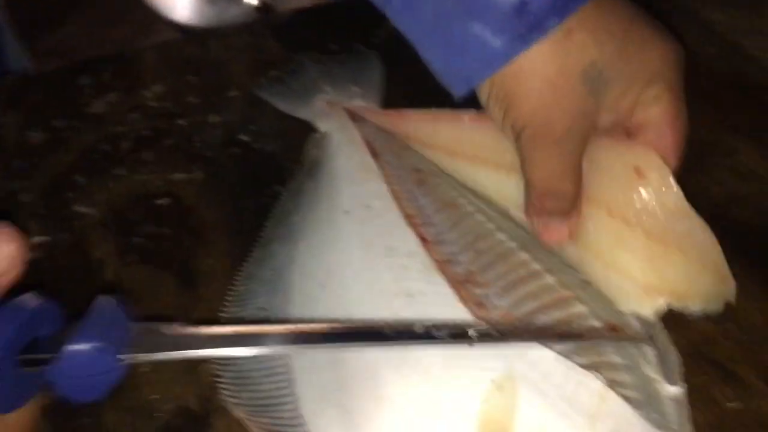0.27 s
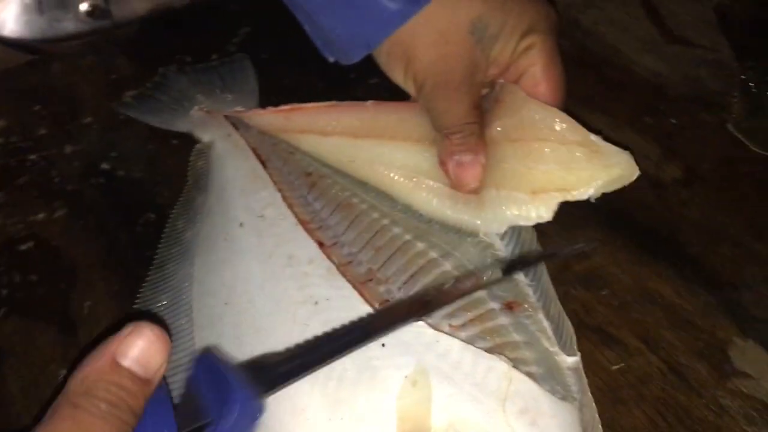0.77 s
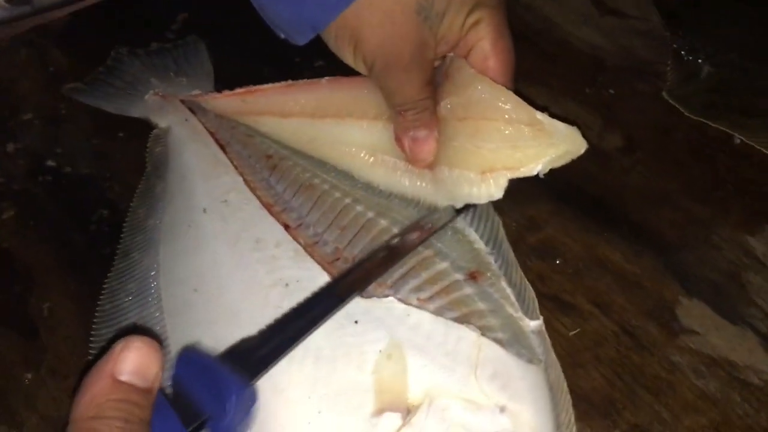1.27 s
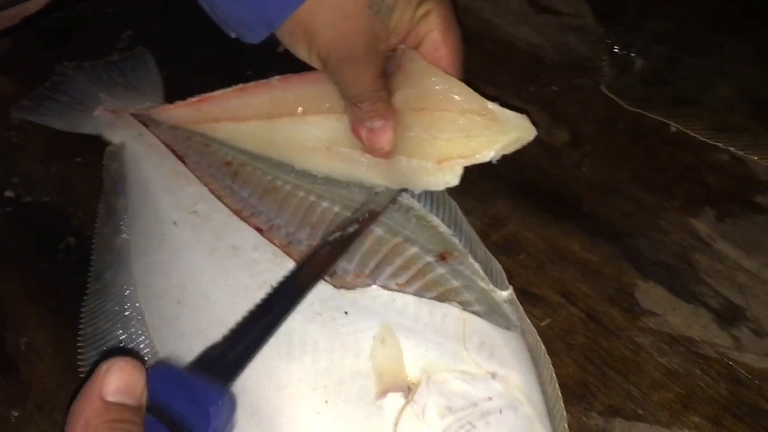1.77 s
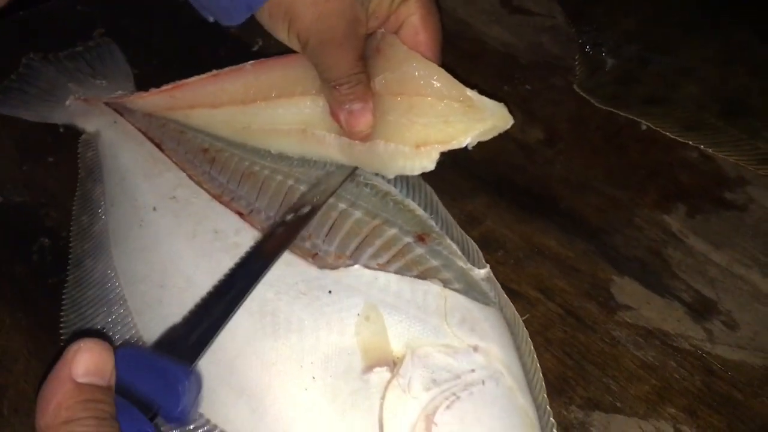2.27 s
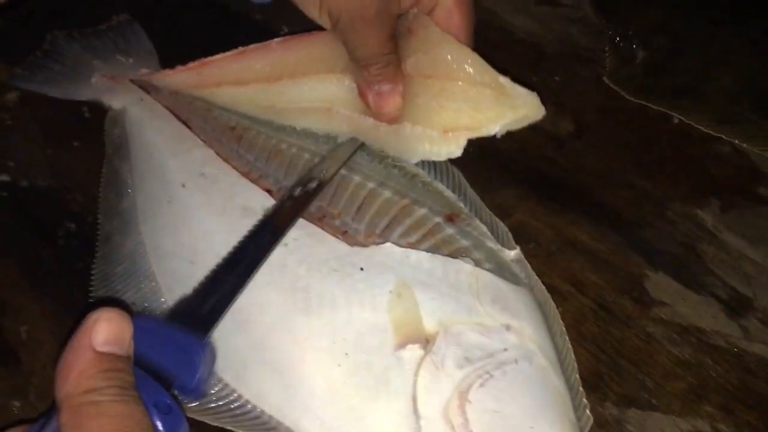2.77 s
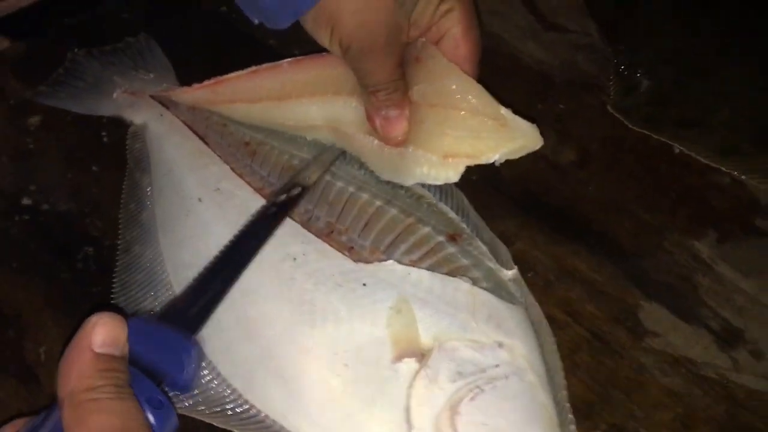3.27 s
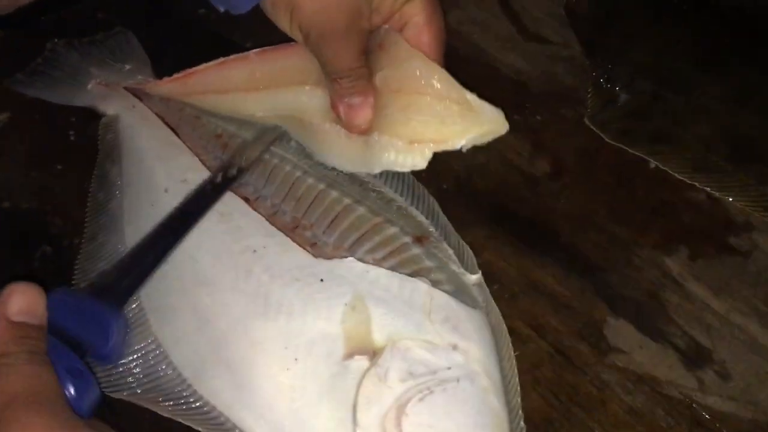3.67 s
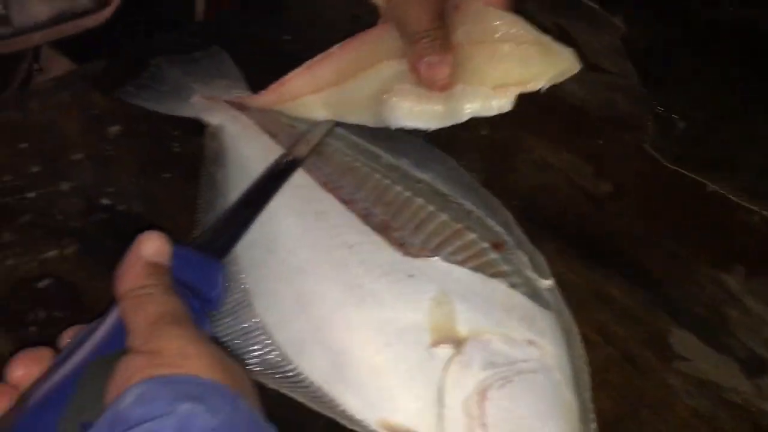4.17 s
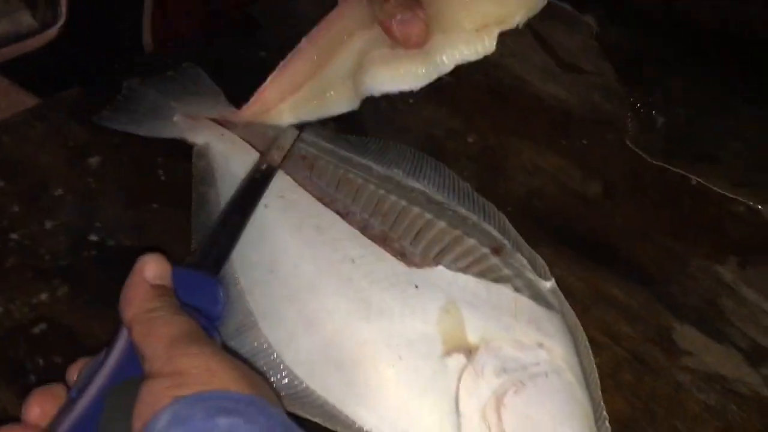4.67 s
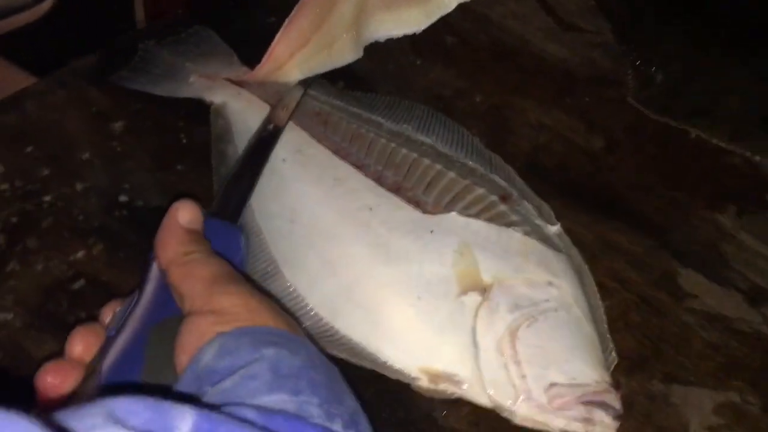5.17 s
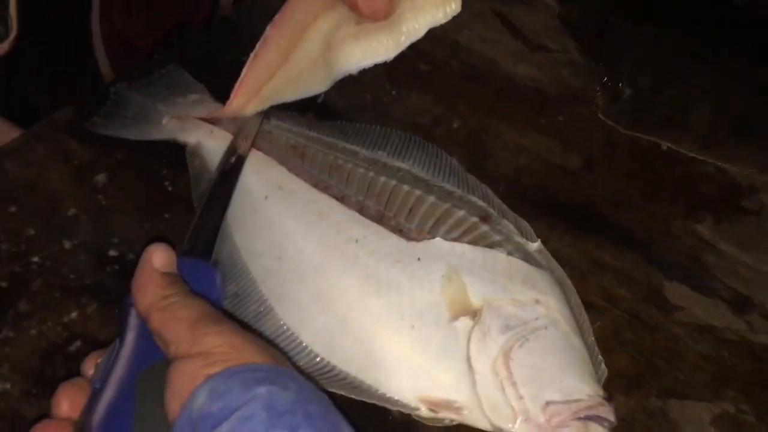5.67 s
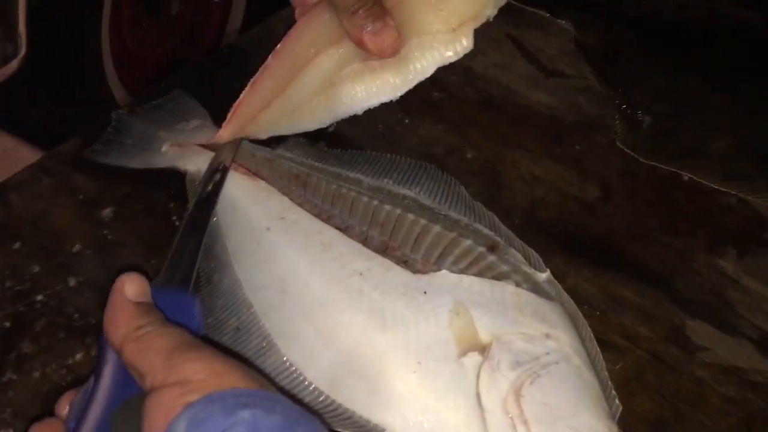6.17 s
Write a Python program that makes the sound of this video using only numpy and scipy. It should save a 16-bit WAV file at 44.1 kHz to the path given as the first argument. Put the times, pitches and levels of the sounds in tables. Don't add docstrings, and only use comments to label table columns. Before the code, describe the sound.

A close, dry electric knife runs without pause, a fast rattling buzz of plastic knocks at each stroke. Twin steel blades scrape and slap, with sharp ticks along fish bones. A thin high whine and gear hiss sit inside it. Soft thuds sound in the first second, over a weak outdoor rumble, caught by a small microphone.

```python
import sys
import numpy as np
from scipy import signal
from scipy.fft import rfft, irfft, next_fast_len
from scipy.io import wavfile
from scipy.ndimage import uniform_filter1d, map_coordinates

SR = 44100
rng = np.random.default_rng(int(sys.argv[2]) if len(sys.argv) > 2 else 0)


def store_wav(level_fs):
    pcm = np.round(np.clip(np.atleast_2d(level_fs), -1, 1) * 32767)
    wavfile.write(sys.argv[1], SR, pcm.T.astype(np.int16))


def gain_from_decibels(decibels):
    exponent = np.asarray(decibels, float) / 20
    return 10 ** exponent


N = 283197


def unit(x):
    return x / np.sqrt(np.mean(x ** 2) + 1e-20)


def curves(rows):
    time_s, *columns = np.transpose(rows)
    return [np.interp(np.arange(N) / SR, time_s, c) for c in columns]


def spells(rows):
    t = np.arange(0, N, 64) / SR
    db = sum(rise_db * np.exp(-((t - s) / max(half_s, .01)) ** 2) for s, half_s, rise_db in rows)
    return np.interp(np.arange(N) / SR, t, db)


def wobble(rate_hz):
    knots = rng.standard_normal(int(N * rate_hz / SR) + 4)
    return map_coordinates(knots, [np.arange(N) * rate_hz / SR])


def filtered(x, response):
    m = next_fast_len(N + 8192)
    return irfft(rfft(x, m) * response(np.fft.rfftfreq(m, 1 / SR)), m)[..., :N]


def coloured(x, spectrum):
    f, db = np.transpose(spectrum)
    return unit(filtered(x, lambda hz: gain_from_decibels(np.interp(np.log(hz + 1), np.log(f), db))))


def bumps(rows):
    return lambda hz: gain_from_decibels(sum(db * np.exp(-((hz - c) / w) ** 2) for c, w, db in rows))


def patchy(patchy_db, bins, frames):
    z = signal.stft(rng.standard_normal(N), nperseg=128)[2]
    field = uniform_filter1d(rng.standard_normal(z.shape), bins, 0)
    field = uniform_filter1d(field, frames, 1)
    return signal.istft(z * gain_from_decibels(patchy_db * unit(field)), nperseg=128)[1][:N]


# time_s, whine_hz (commutator)
SPEED = [(0.0, 13791.2), (0.15, 13780.8), (0.5, 13859.2), (0.65, 13806.9), (1.05, 13816.4), (1.4, 13723.1),
         (2.15, 13622.6), (2.5, 13590.2), (2.7, 13632.6), (3.1, 13507.5), (3.5, 13588.3), (3.9, 13703.7),
         (4.25, 13774.7), (4.87, 13656.5), (5.15, 13868.7), (5.3, 13842.9), (5.7, 13719.9), (6.42, 13658.8)]
WHINE_PER_TURN, START_TURNS = 400.335, 1.021


def crank():
    return START_TURNS + np.cumsum(curves(SPEED)[0]) / SR / WHINE_PER_TURN


def burst(turns, rise_turns, fall_turns, scatter_db, jitter_turns):
    luck = rng.standard_normal((300, 2))[(turns + 1 / 4).astype(int)]
    u = (turns + 1 / 4) % 1 - 1 / 4 - jitter_turns * luck[:, 0]
    shape = np.exp(-np.where(u < 0, (u / rise_turns) ** 2, u / fall_turns))
    return gain_from_decibels(scatter_db * luck[:, 1]) * shape


def ring(blows, modes, scatter_db, soft_hz):
    def mode(f):
        resonance = 1j * f * w / (c * c - f * f + 1j * f * w)
        low_cut = (f * f / (f * f - 560 ** 2 - 700j * f)) ** 2
        return resonance * low_cut / (1 + 1j * f / soft_hz) ** 3

    out = 0
    for c, w, db in modes:
        struck = blows * gain_from_decibels(scatter_db * rng.standard_normal(N))
        out = out - gain_from_decibels(db) * filtered(struck, mode)
    return out


# time_s, knock_delay_turns, slap_angle_turns, buried_in_flesh_0_to_1
CONTACT = [(0, .17, .68, 0), (.6, .13, .65, .2), (1.0, .06, .62, .8), (1.25, .03, .56, .9),
           (1.45, .025, .44, 1), (2.2, .02, .43, 1), (2.4, .0, .7, 1), (4.8, .0, .68, 1),
           (5.05, .0, .47, 1), (5.35, .0, .47, 1), (5.5, .0, .65, 1), (6.42, .0, .66, 1)]
# time_s, push_db (on handle), play_db (between blades), slack_db (at drive pin)
HAND = [(0, -1, 2.5, -0.5), (.25, -1, 2, -3.5), (.6, 1, 2.5, -4.5), (1.0, 0.5, 3, -5.5),
        (1.4, 2.5, -1, -2.5), (2.0, 3, 0, -0.5), (2.2, 2, -4, -2.5), (2.45, 3, 0.5, -2.5), (3.0, 2, 2, 1),
        (3.4, 0, 1, -1.5), (4.0, 1, -2, -2), (4.4, 2, -4.5, -3.5), (4.8, 2.5, -6, -3), (5.2, 2, -4, -4),
        (5.4, 1.5, -3, 0.5), (5.7, 2, -6.5, 0), (6.0, 0, -1.5, 1.5), (6.42, 2.5, -7, -1)]
# time_s, peak_db
HARD_KNOCKS = [(0.456, -8.5), (0.601, -11.5), (0.63, -17), (0.703, -15), (0.717, -12), (0.891, -10),
               (0.932, -18), (0.947, -9), (0.992, -18), (1.005, -8), (1.049, -19), (1.063, -6.5),
               (1.193, -12), (1.21, -11), (1.241, -13), (1.309, -11), (1.341, -13), (1.383, -14),
               (1.429, -7), (1.457, -8), (1.545, -8), (1.573, -17), (1.587, -7.5), (1.633, -9),
               (1.646, -13), (1.721, -13), (1.747, -10), (1.776, -5), (1.835, -10), (1.851, -12),
               (1.924, -10), (1.952, -7), (2.057, -14), (2.07, -8.5), (2.146, -14), (2.187, -15),
               (2.202, -8), (2.247, -14), (2.335, -16), (2.365, -8), (2.423, -14), (2.452, -9), (2.481, -8),
               (2.512, -6.5), (2.658, -12), (2.674, -14), (2.734, -19), (2.748, -7), (2.805, -11),
               (2.834, -10), (2.864, -14), (2.911, -14), (2.939, -11.5), (2.969, -8), (3.041, -17),
               (3.071, -9),
               (3.266, -14), (3.277, -9), (3.308, -9), (3.354, -12), (3.366, -9), (3.384, -13),
                    (3.444, -17), (3.455, -13), (3.483, -13), (3.544, -11), (3.633, -8), (3.705, -7),
                    (3.749, -9), (3.866, -12), (3.925, -12), (4.014, -14), (4.069, -14.5), (4.1, -16),
                    (4.128, -12), (4.188, -9), (4.216, -19), (4.262, -21), (4.274, -6.5), (4.303, -9),
                    (4.332, -8.5), (4.362, -11), (4.39, -9), (4.449, -8), (4.478, -8), (4.506, -11),
                    (4.566, -7), (4.625, -9), (4.669, -13), (4.712, -6), (4.858, -14), (4.902, -9),
                    (5.004, -8), (5.08, -9), (5.323, -7.5), (5.379, -13), (5.452, -11), (5.497, -13),
                    (5.514, -7), (5.6, -6), (5.687, -16.5), (5.759, -9), (5.787, -11), (5.832, -17),
                    (5.876, -13), (5.994, -16), (6.05, -15), (6.125, -8), (6.153, -12), (6.183, -6.5),
                    (6.211, -6), (6.256, -12)]
# time_s, forward_db, late_rebound_db
LEAN = [(0, -0.5, 0), (.9, 7, 7), (1.3, 2, 6), (1.7, 2, -1), (2.2, 2, 1), (2.5, 1.5, -4), (4.2, 3, 2),
        (4.9, 5, 4), (5.2, -1, 12.5), (5.6, 2, -4), (6.42, -4.5, 3.5)]
# centre_hz, width_hz, level_db
FREE_MODES = [(667, 48, 1), (1220, 770, -6), (1720, 180, -6), (3250, 160, -5)]
# centre_hz, width_hz, level_db
BURIED_MODES = [(700, 91, -7.5), (1104, 318, -2), (1780, 130, -7.5), (3040, 410, -17)]
KNOCK_DB, BURIED_KNOCK_DB, KNOCK_PER_PUSH = -33.5 + 18.5, 5, 0.35
HARD_LAG_S, HARD_DB = .0008, 30.5


def knocks():
    delay, _, buried = curves(CONTACT)
    push_db, _, slack_db = curves(HAND)
    stroke = np.floor(2 * (crank() - delay - .225))
    ends = np.flatnonzero(np.diff(stroke) > 0) + 1
    luck = rng.standard_normal((500, 8))[:len(ends)]
    hard_s, hard_db = np.transpose(HARD_KNOCKS)
    hard = np.round((hard_s + HARD_LAG_S) * SR).astype(int)
    spared = np.abs(ends[:, None] - hard).min(1) > .006 * SR
    forward = stroke[ends] % 2 == 0
    lean_db, rebound_db = (c[ends] for c in curves(LEAN))
    # lag_s, spread_s, level_db, forward_db, extra_db, played, sign
    hits = [(0, .0005, 1, 0, lean_db, spared, 1),
            (.002, .001, -13, 1, lean_db, 1, 1),
            (-.002, .0012, -17, 2, lean_db, spared, -1),
            (.0075, .001, -15, 5, rebound_db, 1, 1)]
    blows = np.zeros(N + SR)
    for k, (lag_s, spread_s, db, forward_db, extra_db, played, sign) in enumerate(hits):
        at = np.abs(ends + SR * (lag_s + spread_s * luck[:, 2 * k])).astype(int)
        hit_db = db + (forward_db + extra_db) * forward + (1.1 + .6 * k) * luck[:, 2 * k + 1]
        np.add.at(blows, at, gain_from_decibels(hit_db) * played * sign)
    level_db = KNOCK_DB + BURIED_KNOCK_DB * buried + KNOCK_PER_PUSH * push_db + slack_db
    blows = unit(blows[:N]) * gain_from_decibels(level_db)
    blows[hard] += gain_from_decibels(hard_db + HARD_DB)
    free_ring = ring(blows * (1 - buried), FREE_MODES, scatter_db=3.2, soft_hz=3670)
    return free_ring + ring(blows * buried, BURIED_MODES, scatter_db=2.0, soft_hz=2600)


# time_s, centre_hz, share_of_scrape
TAIL_RING = [(0, 3100, 0.11), (4.7, 3050, 0), (5.0, 3060, 0.55), (5.3, 3215, 0.31), (6.05, 3290, 0.27),
             (6.42, 2640, 0.4)]
TAIL_RING_WIDTH_HZ = 400


def tail_ring(envelope):
    centre_hz, share = curves(TAIL_RING)
    phase = 2 * np.pi * np.cumsum(centre_hz) / SR
    band = wobble(TAIL_RING_WIDTH_HZ) * np.sin(phase) + wobble(TAIL_RING_WIDTH_HZ) * np.cos(phase)
    return np.clip(share, 0, 1) * unit(envelope * band)


# freq_hz, level_db_per_hz
STEEL = [(1200, -11.5), (2200, 4), (3000, 0.5), (4200, 1.5), (6500, 0), (8000, -4.5), (10000, -8),
         (13000, -10.5), (16500, -15.5)]
SCRAPE_DB = -35 + 1.5


def scrape():
    buried, play_db = curves(CONTACT)[2], curves(HAND)[1]
    angle, grit = crank(), gain_from_decibels(1.5 * wobble(1500))
    drag = burst(angle - .14 - 0.024 * (1 - buried), 0.074, 0.15, scatter_db=1.5, jitter_turns=0.014)
    drag += 0.22 * burst(angle - .72, 0.027, .2, scatter_db=1.5, jitter_turns=0.015)
    drag += 0.31 * burst(angle - .44, 0.055, 0.16, scatter_db=1.8, jitter_turns=.015)
    rub = unit(unit(drag * grit) * coloured(patchy(2.6, 8, 3), STEEL))
    return gain_from_decibels(SCRAPE_DB + play_db) * (rub + tail_ring(drag))


# freq_hz, level_db
BRIGHT = [(3000, -5), (6000, 3), (9000, 1.5), (14000, -7.5), (16500, 2)]
# freq_hz, level_db_per_hz
SLAP = [(1500, -4.5), (3000, -0.5), (5000, 2.5), (7000, -5.5), (9500, 0), (11500, -2.5), (14000, -13),
        (16500, -7.5)]
# centre_s, half_s, rise_db
SLAPPING = [(.25, 0.36, 18), (.85, 0.33, 16), (1.5, 0.39, 17.5), (2.5, 0.39, 11), (3.62, .12, 7),
            (4.15, 0.4, 9.5), (4.68, 0.17, 12.5), (5.25, 0.2, 7), (5.6, 0.15, 6), (6.12, 0.29, 13)]
SLAP_DB = -46 - 7.0


def slaps():
    _, slap_angle, buried = curves(CONTACT)
    contact = burst(crank() - slap_angle - .01, 0.014, 0.048, scatter_db=2.7, jitter_turns=0.016)
    slap = coloured(unit(contact * patchy(0.75, 8, 3)), SLAP)
    slap = slap + .5 * (1 - buried) * coloured(slap, BRIGHT)
    return gain_from_decibels(SLAP_DB + spells(SLAPPING)) * slap


# time_s, peak_db
SHARP_TICKS = [(0.0917, -24), (0.1057, -14), (0.136, -12), (0.2063, -16), (0.2219, -20), (0.2498, -19),
               (0.309, -13), (0.3366, -13), (0.351, -7), (0.395, -8), (0.4234, -15), (0.5103, -16),
               (0.61, -17), (0.6563, -12), (0.7417, -14), (0.7587, -14), (0.7711, -10), (0.829, -11),
               (0.841, -15), (0.857, -6.5), (0.8869, -12), (0.99, -11), (1.1183, -8.5), (1.28, -16),
               (1.398, -13), (1.48, -17), (1.5426, -17), (1.6083, -11), (1.95, -19), (1.98, -14),
               (2.0383, -21), (2.244, -17), (2.4204, -21), (2.7437, -21), (2.7731, -18), (2.8614, -21),
               (2.8912, -11), (2.947, -11), (2.9764, -14), (3.0051, -14), (3.0385, -23), (3.064, -13),
               (3.213, -16), (3.3025, -11), (3.331, -14), (3.36, -11), (3.4192, -16), (3.4825, -15),
               (3.5379, -22), (3.6591, -13), (3.685, -12), (3.7143, -9.5), (3.8632, -7), (3.9397, -11.5),
               (4.011, -8), (4.04, -12), (4.07, -14), (4.0986, -13),
               (4.1859, -17), (4.319, -11), (4.3884, -19), (4.4338, -15), (4.5939, -15), (4.623, -19),
                    (4.639, -12), (4.767, -19), (4.7965, -20), (4.9016, -13.5), (5.0743, -13),
                    (5.1477, -22), (5.2938, -21), (5.3512, -16), (5.3804, -16), (5.4081, -21),
                    (5.4959, -18), (5.6565, -18), (5.7862, -20), (5.9618, -25), (6.0192, -24),
                    (6.0476, -24)]
# centre_s, half_s, rise_db
TICKING = [(.3, 0.18, 5), (1.9, .3, 2), (2.55, 0.2, 6), (3.0, .12, 4), (3.45, 0.46, 11), (4.2, 0.11, 11),
           (5.9, 0.18, 13)]
TICK_DB, TICK_PER_PLAY, SHARP_TICK_DB, SHARP_T60_S = -57 + 23, 0.82, -8, 0.013


def ticks():
    level_db = TICK_DB + TICK_PER_PLAY * curves(HAND)[1] + spells(TICKING)
    tick = burst(crank(), .006, .03, scatter_db=1.8, jitter_turns=.008) * gain_from_decibels(level_db)
    for s, db in SHARP_TICKS:
        tail = tick[round(s * SR):][:900]
        tail += gain_from_decibels(db + SHARP_TICK_DB - 60 * np.arange(len(tail)) / SR / SHARP_T60_S)
    noise = tick * rng.standard_normal(N)
    return gain_from_decibels(-9) * filtered(noise, lambda hz: gain_from_decibels(np.interp(hz, *np.transpose(BRIGHT))) * 3)


# freq_hz, level_db_per_hz
GEARS = [(240, -15), (420, -23.5), (520, -30), (660, 3), (885, -1), (1100, -3), (1530, -0.5), (1990, -2),
         (2630, -9.5), (4400, -12.5), (9000, -17.5), (12000, -22), (16500, -60)]
GEAR_DB = -30.7 - 1


def gears():
    load = gain_from_decibels(2.6 * np.cos(4 * np.pi * (crank() - .26)) + 2.28 * wobble(300))
    return unit(load * coloured(patchy(0.28, 4, 20), GEARS)) * gain_from_decibels(GEAR_DB + curves(HAND)[0])


# freq_hz, level_db_per_hz
AIR = [(1500, -46), (3000, 5), (6000, 5), (9000, -3), (12000, -19), (14000, 6), (16500, -11)]
AIR_DB, AIR_PER_PLAY = -43, 0.36


def fan():
    return coloured(patchy(2.4, 6, 30), AIR) * gain_from_decibels(AIR_DB + AIR_PER_PLAY * curves(HAND)[1])


# centre_hz, width_hz, gain_db
SHELL = [(1520, 150, -2.5), (2010, 135, 3.5), (2256, 79, -2), (2970, 74, -1), (3400, 150, 1),
         (3600, 104, -1.5), (4210, 320, 2), (4880, 200, -2), (6860, 117, 0.5), (7350, 230, -2),
         (9080, 260, 2), (10400, 390, -3), (11000, 200, 1.5), (11600, 550, -1)]
# centre_hz, width_hz, gain_db
OPEN = [(2900, 610, 3.5), (6600, 320, 2.5), (9400, 240, -4), (10200, 470, 2.5), (12800, 450, 5)]
# centre_hz, width_hz, gain_db
TURNED = [(750, 200, -9), (1940, 520, -1.5), (3090, 350, 3.5), (4740, 900, -2), (7800, 510, -3.5),
          (9200, 280, 2), (11800, 2600, -5.5)]
# time_s, turned_0_to_1
TURNING = [(0, 0), (4.2, 0), (5.0, 0.3), (6.42, 0.74)]


def housing(x):
    knife = filtered(x, bumps(SHELL))
    free, turning = 1 - curves(CONTACT)[2], np.clip(curves(TURNING)[0], 0, 1)
    plain = (1 - free - turning) * knife
    return plain + free * filtered(knife, bumps(OPEN)) + turning * filtered(knife, bumps(TURNED))


# centre_s, half_s, centre_hz, width_hz, gain_db
PASSING = [(.15, 0.18, 6530, 400, 3.5), (.25, .3, 4200, 350, -4), (.8, 0.3, 2250, 250, -6.5),
           (.8, 0.33, 1630, 150, 3), (1.35, .3, 1720, 130, 3.5), (1.35, .25, 2250, 200, -2),
           (1.35, 0.29, 4440, 150, 3.5), (2.85, .5, 4850, 200, -5), (4.8, .6, 1620, 170, -4),
           (5.1, .15, 3140, 300, 3), (6.0, 0.32, 1960, 250, -3), (6.0, .4, 1520, 130, 5),
           (6.33, .12, 2750, 250, 4), (.3, .3, 13200, 250, 6), (.3, .3, 10100, 700, 3.5),
           (.15, 0.18, 3120, 500, -4), (5.7, 0.12, 1100, 200, -0.5), (1.2, .2, 11000, 2500, -0.5)]


def passing(x):
    t = np.arange(N) / SR
    for s, half_s, centre_hz, width_hz, db in PASSING:
        band = filtered(x, lambda hz: np.exp(-((hz - centre_hz) / width_hz) ** 2))
        x = x + (gain_from_decibels(db) - 1) * np.exp(-((t - s) / max(half_s, .05)) ** 2) * band
    return x


# share_of_whine, level_db_rms, wander_db
TONES = [(47 / 48, -66.5, 3), (49 / 48, -66.5, 3), (50 / 48, -65, 4), (1 / 2, -57, 2.4), (2 / 3, -66, 3.7),
         (1 / 48, -61, 1.5), (2 / 400, -60, 3), (3 / 400, -56.5, 1.5), (7 / 400, -70, 1.9)]
# centre_s, half_s, change_db
BREAKS = [(.05, .14, -18), (.56, .07, -18), (1.27, .06, -12), (1.73, .06, -12), (2.56, .06, -12),
          (3.35, .04, -8), (3.95, .07, -20), (4.4, .04, -18), (4.75, .16, -18), (5.2, .15, -6),
          (5.37, .04, -12), (5.96, .04, -12)]
# centre_s, half_s, rise_db
THIRD_SINGS = [(.3, 0.26, 8), (.8, .1, 0), (1.6, 0.51, 3), (5.65, 0.33, 5), (6.2, 0.33, 5.5)]
# centre_s, half_s, rise_db
SIXTH_SINGS = [(1.1, 0.12, 4), (2.6, 0.48, 4), (4.5, .4, -2), (5.8, .2, 0)]
WHINE_DB, THIRD_DB, SIXTH_DB = -52 + 3.5, -50.5 + 1.5, -50 + 2.5
IDLE_HZ, SIXTH_PER_SAG_HZ = 13850, 0.014


def motor():
    whine_hz, = curves(SPEED)
    phase = 2 * np.pi * np.cumsum(whine_hz) / SR
    tones = 0
    for share, db, wander_db in TONES:
        level = gain_from_decibels(db + 5 + wander_db * wobble(5.2))
        tones = tones + level * np.sin(share * phase + 0.92 * wobble(40))
    sag_db = SIXTH_PER_SAG_HZ * (IDLE_HZ - whine_hz)
    strong = [(1, WHINE_DB + spells(BREAKS)),
              (1 / 3, THIRD_DB + spells(THIRD_SINGS)),
              (1 / 6, SIXTH_DB + sag_db + spells(SIXTH_SINGS))]
    for share, db in strong:
        shaken = phase + 0.5 * wobble(45) + 1.5 * wobble(8)
        tones = tones + gain_from_decibels(db + 2.2 * wobble(14)) * np.sin(share * shaken)
    free_hum = gain_from_decibels(-51 - 11 * curves(CONTACT)[2] ** 4) * np.sin(5 / 400 * phase)
    return tones + free_hum


# start_s, pitch_hz, peak_db, t60_s
THUDS = [(.03, 63.3, -38, 0.27), (.6, 58.7, -36, 0.23), (0.709, 58, -40, 0.37), (0.891, 62, -37, 0.21),
         (1.08, 67, -56, 0.15)]


def thuds():
    out, t = np.zeros(N + SR), np.arange(SR // 2) / SR
    for s, hz, db, t60_s in THUDS:
        envelope = gain_from_decibels(db - 60 * t / t60_s) * (1 - np.exp(-t / 0.0098))
        out[round(s * SR):][:len(t)] += envelope * 2 * np.sin(2 * np.pi * hz * t)
    return out[:N]


# freq_hz, level_db_per_hz
RUMBLE = [(12, -56), (20, -58), (53, 0.5), (86, 2), (134, -4.5), (240, -26), (278, -5.5), (435, -14),
          (700, -1), (910, 3), (1540, -120)]
# centre_s, half_s, rise_db
GUSTS = [(1.9, 0.1, -2), (2.6, .15, 0), (3.2, .15, -5), (4.15, 0.33, 3.5), (4.85, .1, 2.5), (5.2, .1, -2),
         (5.65, 0.28, 4.5), (6.1, 0.11, 4.5)]
RUMBLE_DB = -51 + 4.5


def rumble():
    level_db = RUMBLE_DB + spells(GUSTS) + 0.44 * wobble(12)
    return gain_from_decibels(level_db) * coloured(rng.standard_normal(N), RUMBLE)


def scene():
    knife = housing(knocks() + scrape() + slaps() + ticks() + gears() + fan())
    return (passing(knife) + motor() + thuds() + rumble())[None]


def low_pass(x):
    return signal.sosfilt(signal.butter(12, 16710, fs=SR, output="sos"), x)


def record(dry):
    low_cut_hz, top_hz = 28.0, 15850
    soft = dry / (1 + np.abs(dry / .6) ** 3) ** (1 / 3)

    def band(hz):
        return hz ** 4 / (hz ** 4 + low_cut_hz ** 4) / (1 + (hz / top_hz) ** 300)

    return low_pass(filtered(soft, band))


dry = scene()
out = record(dry)
store_wav(out)
```